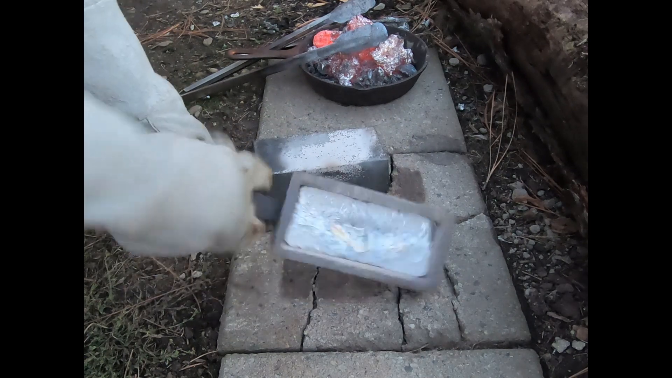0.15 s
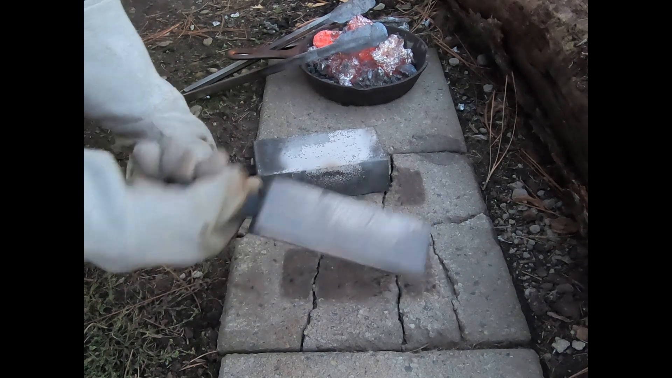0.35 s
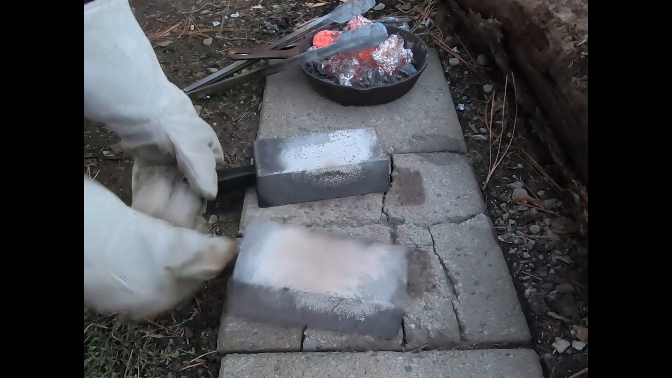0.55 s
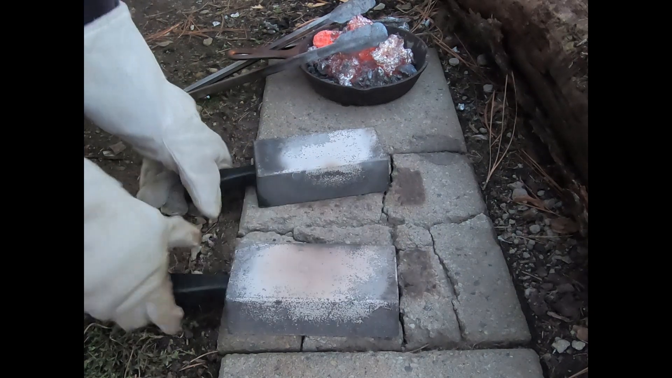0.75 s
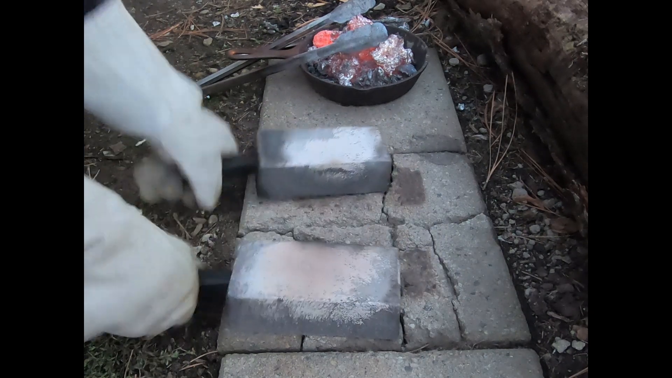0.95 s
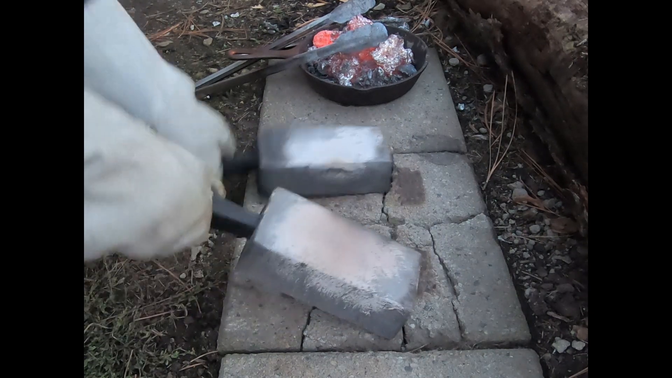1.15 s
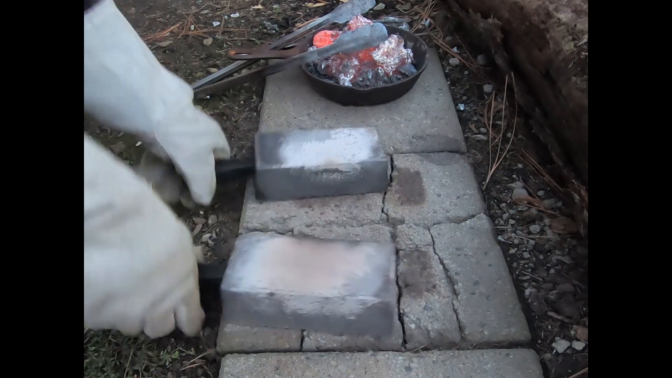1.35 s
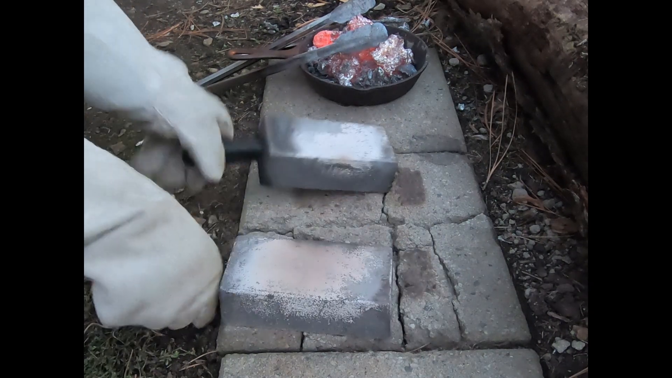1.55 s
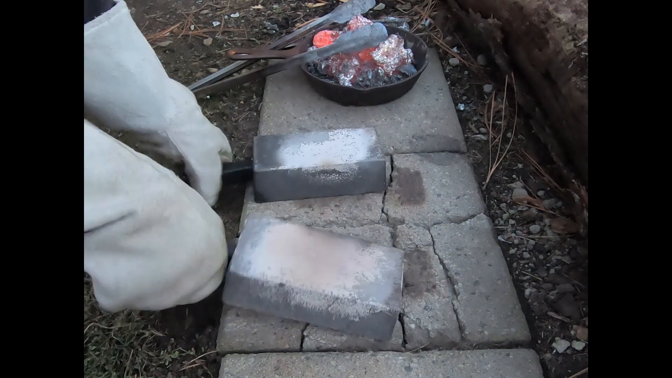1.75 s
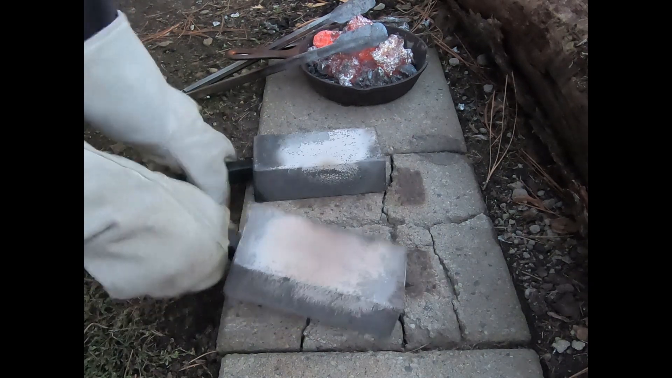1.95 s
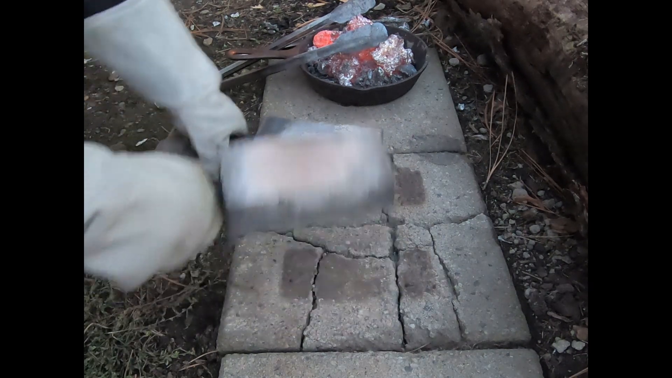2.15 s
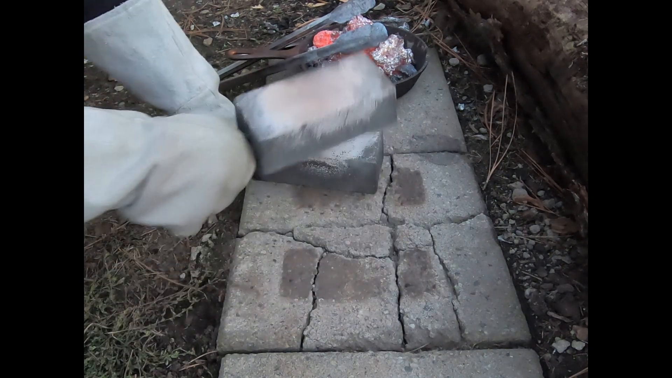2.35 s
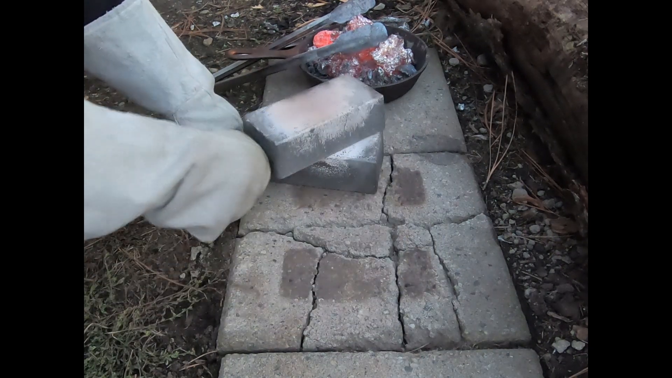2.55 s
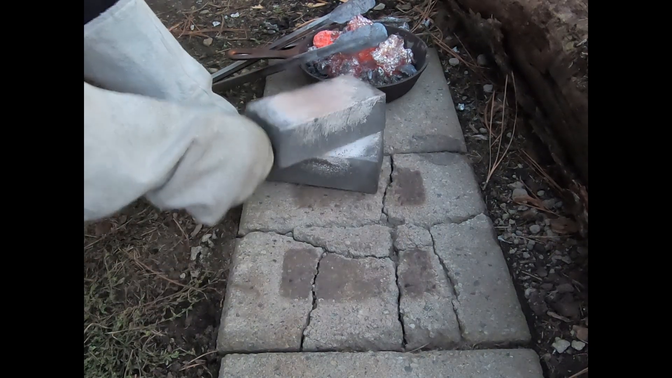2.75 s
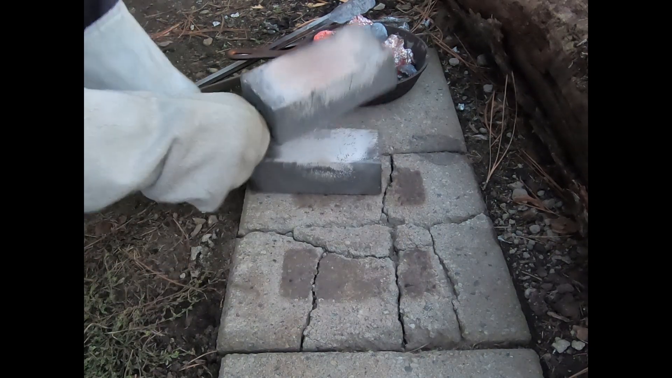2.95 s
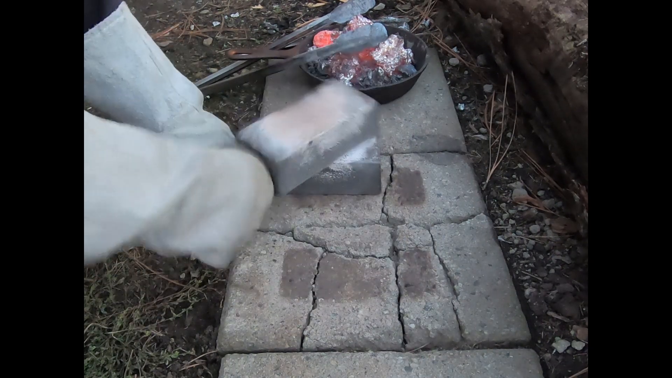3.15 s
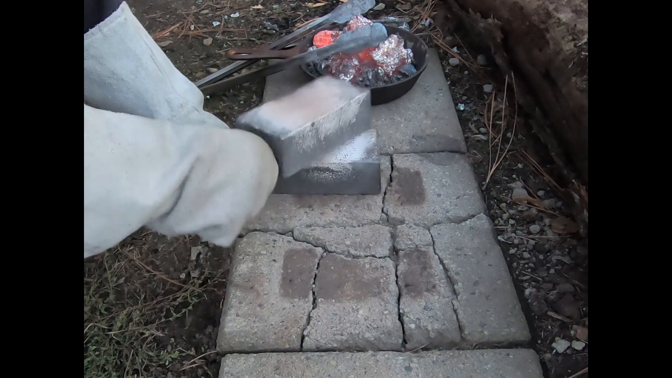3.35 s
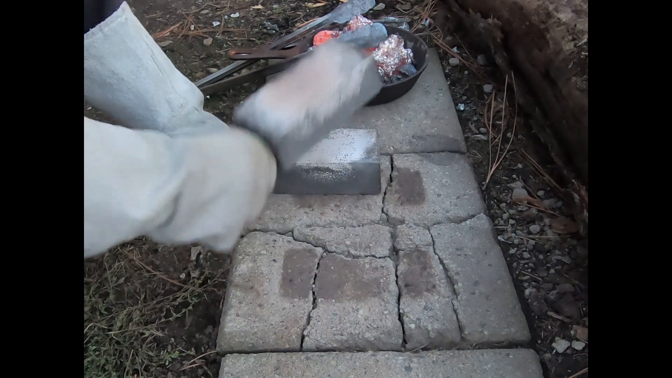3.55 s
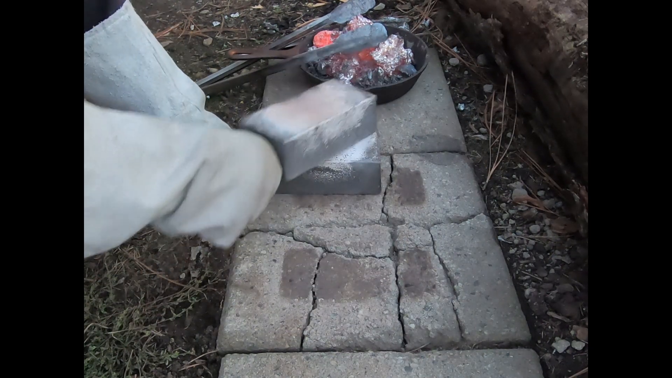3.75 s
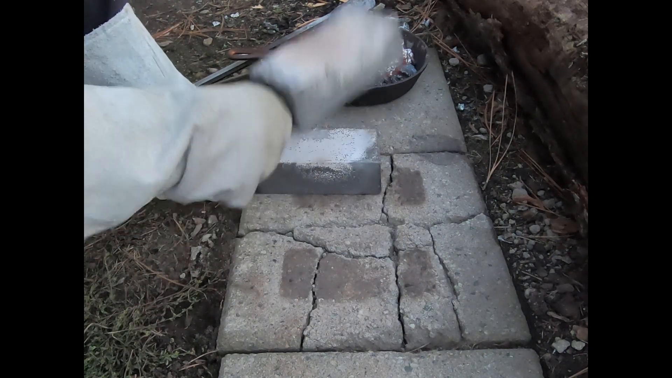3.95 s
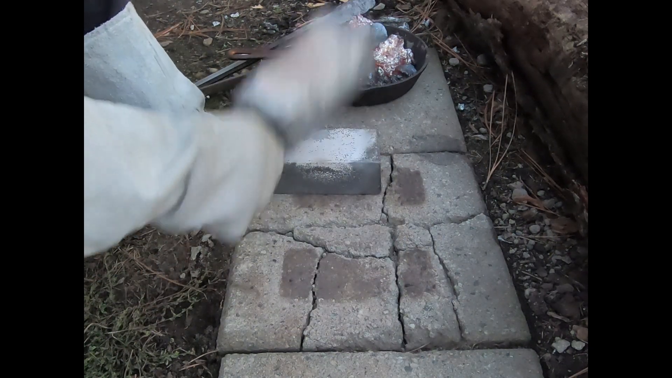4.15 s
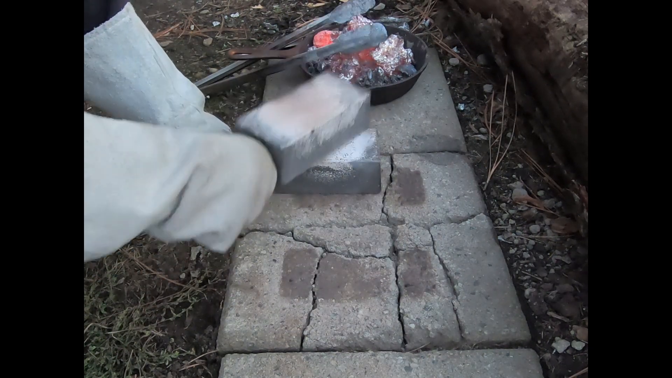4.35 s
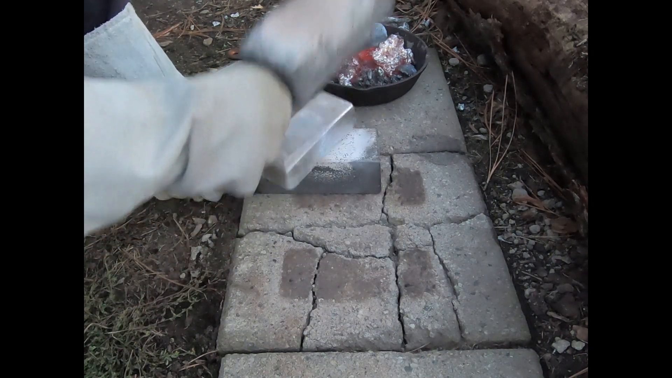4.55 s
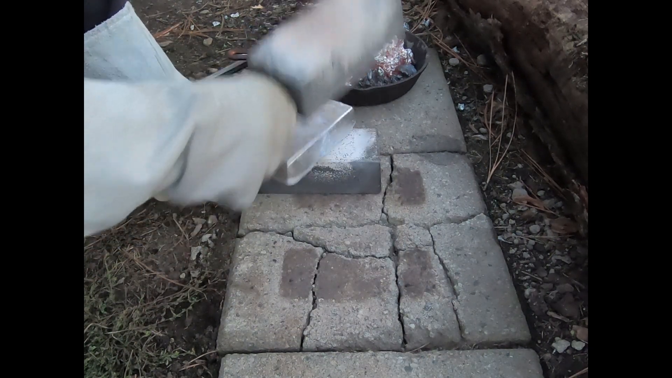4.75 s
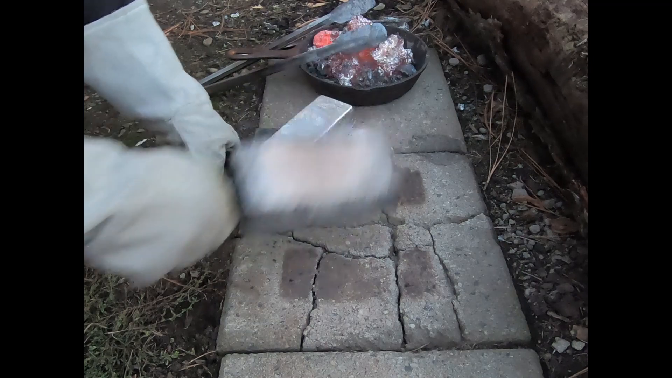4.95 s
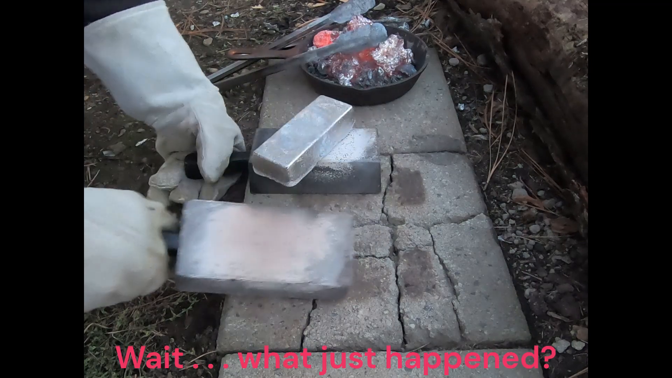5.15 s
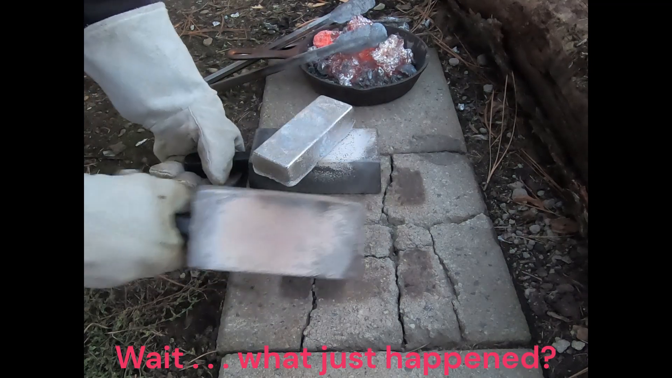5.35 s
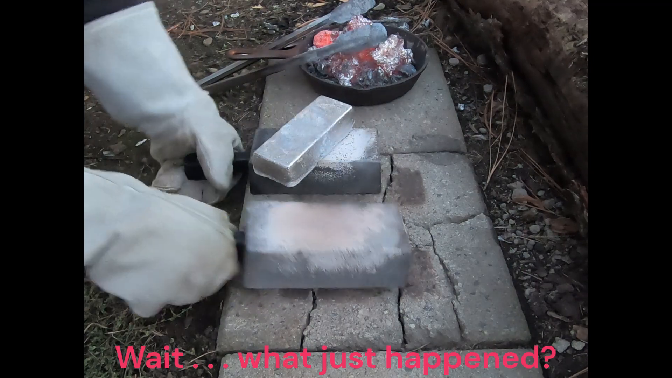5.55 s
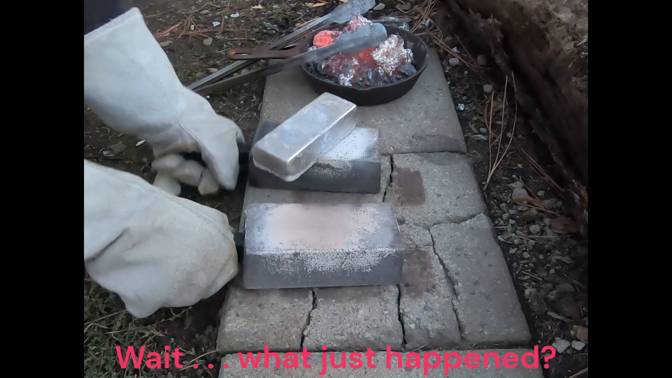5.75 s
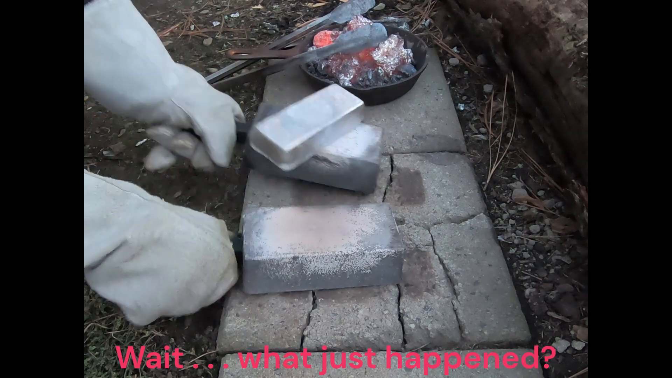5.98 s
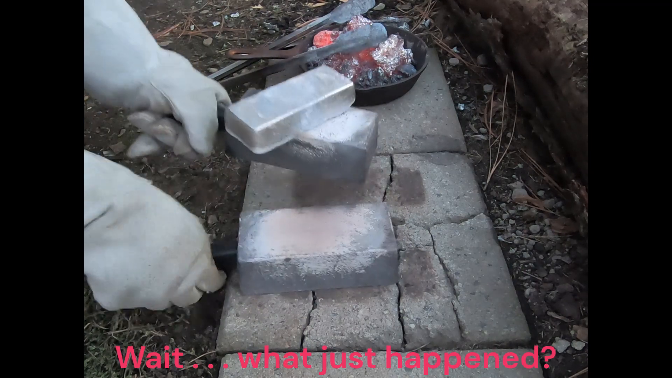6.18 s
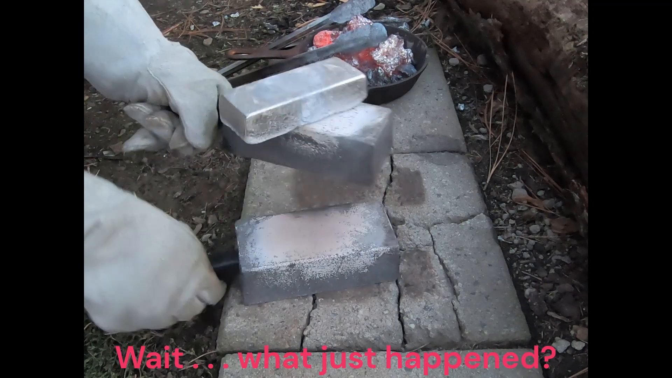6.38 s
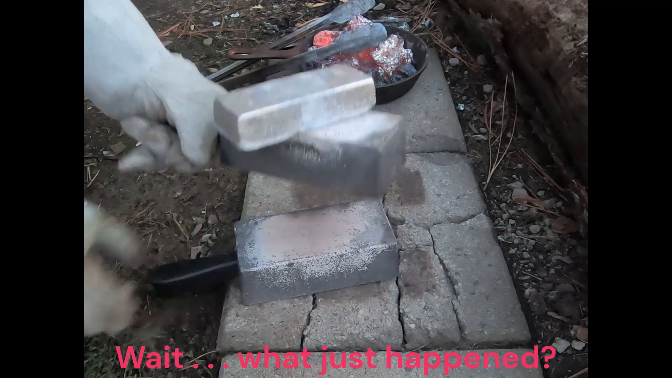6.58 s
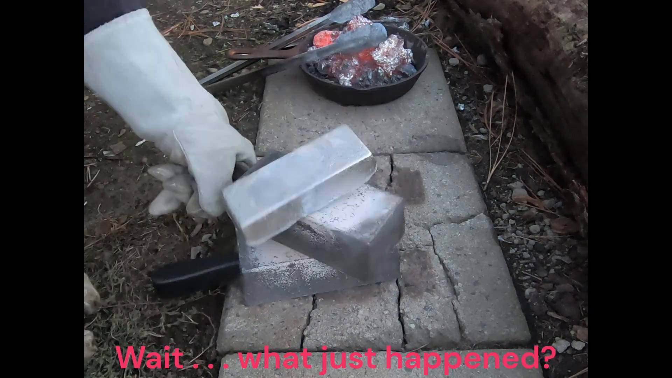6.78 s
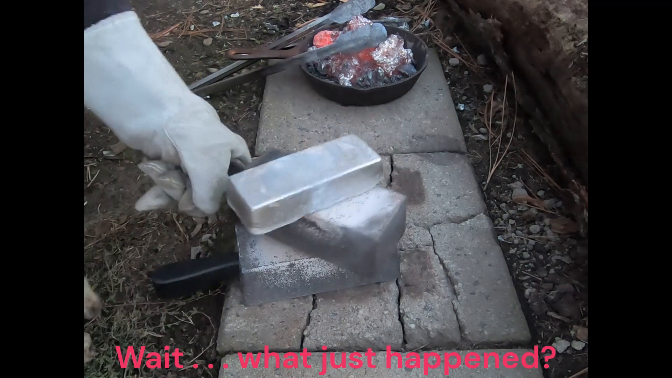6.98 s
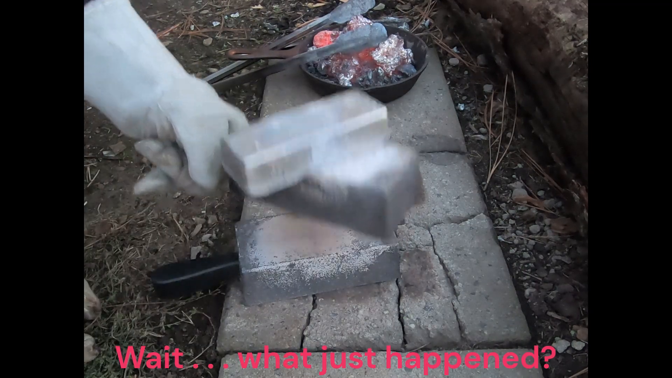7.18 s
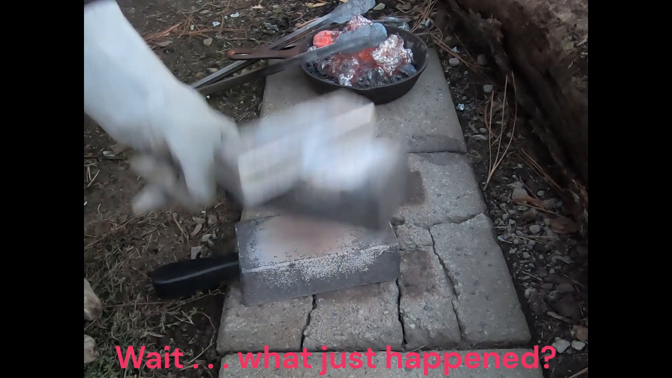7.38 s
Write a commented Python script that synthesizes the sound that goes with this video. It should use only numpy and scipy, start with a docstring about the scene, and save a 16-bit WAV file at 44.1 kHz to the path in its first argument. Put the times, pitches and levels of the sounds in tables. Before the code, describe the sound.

A heavy iron mould rattles and thumps on concrete pavers, then bangs hard on a second mould until a metal ingot clinks loose outdoors.

```python
"""A quick rattle of iron on stone comes first, over distant traffic, then heavier thumps and loud bangs.
A cast-iron ingot mould is flipped and banged on concrete pavers and on a second mould, in a yard.
Each contact is a low thump of dying sines, a clack of noise bursts and the ringing modes of the iron.
A freed ingot clinks with short modes; gloves and grit rub as shaped noise; grit snaps in tiny bursts.
A far wall throws the blows back; near the end the sound turns wider and brighter."""
import sys
import numpy as np
from scipy import signal
from scipy.io import wavfile
from scipy.ndimage import uniform_filter1d

SR = 44100
rng = np.random.default_rng(int(sys.argv[2]) if len(sys.argv) > 2 else 0)


def unload_wav(signal):
    """Save mono or channel-first audio to the path in sys.argv[1] as 16-bit WAV at rate SR, clipped to [-1, 1]."""
    wavfile.write(
        sys.argv[1],
        SR,
        np.round(np.clip(np.atleast_2d(signal).T, -1, 1) * 32767).astype(np.int16),
    )


N = 327222  # length in samples


def amp(db):
    """Turns decibels into a gain."""
    return 10 ** (np.asarray(db) / 20)


def evened(x):
    """Scales a signal to an average (rms) strength of 1."""
    return x / np.sqrt(np.mean(x ** 2) + 1e-20)


def read(points, hz):
    """Reads a curve between its points, along a logarithmic pitch axis."""
    point_hz, value = np.transpose(points)
    return np.interp(np.log(hz + 1), np.log(point_hz + 1), value)


def add(mix, start_s, sound):
    """Mixes a sound in from a given second, cutting off what runs past the end."""
    part = mix[round(start_s * SR):][:len(sound)]
    part += sound[:len(part)]


def coloured(x, points):
    """Filters to a (Hz, dB) curve with minimum phase, so that blows keep their sharp front."""
    db = np.maximum(read(points, abs(np.fft.fftfreq(8192, 1 / SR))), -100)
    log_gain = np.log(amp(db))
    taps = np.fft.ifft(np.exp(np.conj(signal.hilbert(log_gain)))).real[:4096]
    taps = taps.reshape((1,) * (x.ndim - 1) + (-1,))
    return signal.oaconvolve(x, taps, axes=-1)[..., :x.shape[-1]]


def along(points):
    """Turns (seconds, dB) points into a gain for every sample."""
    return amp(np.interp(np.arange(N) / SR, *np.transpose(points)))


def rung(modes, t):
    """Sums dying sines: a struck solid vibrates at several pitches, each fading at its own rate."""
    return sum(amp(db - 60 * t / t60) * np.sin(2 * np.pi * hz * t) for hz, db, t60 in modes)


def burst(noise, t, lo_hz, hi_hz, t60):
    """Makes a short band of noise that dies at once, with its peak at 1."""
    band = signal.butter(3, [lo_hz, min(hi_hz, SR / 2.2)], "band", fs=SR, output="sos")
    x = signal.sosfilt(band, noise * amp(-60 * t / t60))
    return x / abs(x).max()


# The tone of the far traffic. Each row: pitch in Hz, relative level per Hz in dB.
TRAFFIC_TONE = [(15, -32.5), (25, -2), (58, 8), (96, -1.5), (187, 1), (403, -42.5), (569, -14.5),
                (781, -8.5), (1230, -12.5), (1780, -15.5), (2440, -27.5), (4990, -35), (11000, -57.5),
                (14000, -77.5)]
TRAFFIC_DB = -52.5  # average level of the whole roar


def traffic():
    """Smooth far roar: noise in short overlapping frames, with slight drifting patches of loudness."""
    frames, hz = N // 256 + 5, np.fft.rfftfreq(1024, 1 / SR)
    a, b, patches = rng.standard_normal((frames, 513, 3)).T
    patches = uniform_filter1d(patches, size=10, axis=0)
    patches = evened(uniform_filter1d(patches, size=16, axis=1))
    z = (a + 1j * b) * amp(read(TRAFFIC_TONE, hz)[:, None] + 2.4 * patches)
    roar = signal.istft(z, nperseg=1024, noverlap=768)[1][:N]
    return amp(TRAFFIC_DB) * evened(roar)


# How long the yard's echo lasts. Each row: pitch in Hz, time to fall by 60 dB in seconds.
YARD_FADE = [(100, 0.19), (400, 0.17), (1500, 0.22), (4000, 0.28), (9000, 0.36)]
# The tone of the echo as it starts. Each row: pitch in Hz, relative level in dB.
YARD_TONE = [(100, 0), (400, 3), (1500, -5.5), (5500, -2), (7000, -4.5)]
WALL_S, WALL_DB, YARD_DB = 0.13, -30, -14  # wall's slap: seconds after the scatter starts; both levels in dB
SWELL_S = 0.011  # hedges and posts before the wall start to answer this much earlier


def yard(x):
    """Echoes: dense scatter dying band by band, and a far wall's slap, a sharp copy and then a smear."""
    hz, t, z = signal.stft(rng.standard_normal(SR), SR, nperseg=256)
    fading_db = read(YARD_TONE, hz)[:, None] - 60 * t / read(YARD_FADE, hz)[:, None]
    tail = signal.istft(z * amp(fading_db), SR, nperseg=256)[1][:SR]
    after_wall = np.arange(SR) / SR - WALL_S
    swell = np.clip(after_wall / SWELL_S + 1, 0, 1) ** 2
    slap = rng.standard_normal(SR) * swell * amp(-60 * np.maximum(after_wall, 0) / 0.31)
    slap[round(WALL_S * SR)] = 14.0  # the sharp copy
    slap = signal.sosfilt(signal.butter(2, [1800, 6500], "band", fs=SR, output="sos"), slap)
    taps = amp(YARD_DB) * tail / np.linalg.norm(tail) + amp(WALL_DB) * slap / np.linalg.norm(slap)
    return signal.fftconvolve(x, np.r_[np.zeros(300), taps])[:N]  # all echoes wait 300 samples


# Hands shake the ground. Each row: time in seconds, level in dB, with straight lines between rows.
BUMPS = [(0, -38), (.97, -47), (1.3, -37.5), (1.88, -51), (2.13, -37.5), (2.35, -48), (3.16, -47),
         (3.372, -66), (3.66, -43.5), (3.987, -58.5), (5.211, -48), (6.138, -49), (6.339, -39.5),
         (6.8, -53), (7.42, -68.5)]


def hands():
    """Lumpy low bumps: low noise whose strength wanders at random."""
    noise = rng.standard_normal(N)
    lumps = noise * amp(3.82 * evened(uniform_filter1d(rng.standard_normal(N), size=900)))
    bumps = coloured(lumps, [(25, -30.0), (70, 4.5), (200, -2.0), (500, -13.0), (1200, -19.0), (5000, -54.0)])
    return along(BUMPS) * evened(bumps)


# Grains of grit crack. Each row: start in seconds, peak level in dB.
SNAPS = [(0.736, -51), (6.101, -46), (6.176, -41), (6.222, -51), (6.375, -31.5)]


def snaps():
    """Very short wide ticks of noise."""
    out, t = np.zeros(N), np.arange(SR // 40) / SR
    for (s, db), noise in zip(SNAPS, rng.standard_normal((len(SNAPS), len(t)))):
        add(out, s, amp(db) * burst(noise, t, lo_hz=700, hi_hz=6900, t60=0.011))
    return out


# The iron mould's own pitches, before the spot struck and the contact change them.
# Each row: pitch in Hz, relative level in dB, time to fall by 60 dB in seconds.
MOULD_MODES = list(zip([1135, 1515, 1980, 2580, 2860, 3040, 3550, 4105, 4204, 4720, 5045, 5440, 6370, 7300, 7660, 8755, 9260, 10030],
               [-5, -8, -8, -7, -3, -6, -2, -2, -13, -6, -2, -5, -7, -14, -10, -14, -17, -15],
               [.09, .1, .06, .08, .14, .1, .1, .1, .3, .08, .18, .12, .1, .08, .07, .08, .08, .06]))


def iron(spot_hz, long, chance, focus_db, longest=np.inf):
    """The mould's modes as one spot excites them: those near its pitch stand out and linger, the rest vary."""
    modes = []
    for (hz, db, t60), luck in zip(MOULD_MODES, chance):
        away = min(abs(np.log2(hz / spot_hz)) / .035, 1)  # 0 at the favoured pitch, 1 from .035 octave off
        level_db = db - focus_db * away + 4 * luck * away
        modes.append((hz, level_db, min(t60 * long, longest) * (1 - .6 * away)))
    return modes


# Iron slides over grit and gloves rub. Each row: start in seconds, length in seconds,
# relative level of the rasp in dB, relative level of the singing iron in dB, pitch it favours in Hz.
SCRAPES = [(0, 0.21, -58.5, -76, 6400), (0.106, 0.055, -64, -58, 3520), (0.187, 0.36, -63.5, -84, 4200),
           (0.297, 0.031, -44.5, -37, 6400), (0.487, 0.12, -46, -68, 2860), (0.539, 0.027, -59, -45, 2700),
           (0.628, 0.072, -42, -63, 4200), (0.908, 0.11, -58.5, -66.5, 4200), (1.07, 0.076, -55, -58, 4200),
           (1.123, 0.081, -55.5, -63.5, 5410), (1.203, 0.059, -43.5, -74, 7660),
           (1.33, 0.055, -40.5, -74, 7660), (1.719, 0.11, -64, -64.5, 5420), (2.124, 0.1, -53.5, -57, 3040),
           (2.236, 0.075, -64, -76, 2860), (4.778, 0.44, -70, -83, 8750), (5.203, 0.18, -69.5, -84, 5040),
           (5.64, 0.07, -63, -56.5, 2860), (5.659, 0.09, -81, -63.5, 5045), (5.977, 0.42, -63, -85.5, 3520),
           (6.189, 0.51, -63, -74, 2860), (6.212, 0.026, -79, -55, 5040), (6.298, 0.048, -83, -63, 5040),
           (6.371, 0.03, -73, -57.5, 5040), (6.518, 0.06, -69, -63, 5040), (6.796, 0.25, -65, -65, 3520)]
RASP_HZ, RASP_RISE = 6980, 0.35  # rasp centre of a 1 s stroke; short scuffs are duller, as length to this power


def scrapes():
    """Clumpy grit rasps in a broad band, and its grains keep the iron modes singing."""
    out, ring_t, t = np.zeros(N), np.arange(SR // 8) / SR, np.arange(SR // 2) / SR
    draws = rng.standard_normal((len(SCRAPES), 4, SR // 2))
    for (s, length, rasp_db, sing_db, spot_hz), (hiss, lumps, grit, luck) in zip(SCRAPES, draws):
        hz = RASP_HZ * length ** RASP_RISE
        stroke = np.sin(np.pi * np.clip(t / length, 0, 1) ** 0.9) ** 1.02
        clumps = stroke * amp(2.8 * evened(uniform_filter1d(lumps, size=400)))
        colour = [(hz / 8, -18), (hz / 3, -5), (hz, .1), (hz * 1.3, -10), (hz * 4, -30)]
        rasp = evened(coloured(hiss * amp(1.9 * grit), colour)) * clumps
        grains = (abs(grit) > 2.5) * grit * clumps  # only the rare strong grains strike the iron
        ring = rung(iron(spot_hz, .8, luck, focus_db=13), ring_t)
        sung = signal.oaconvolve(grains, ring)[:len(t)]
        add(out, s, amp(rasp_db) * rasp + amp(sing_db) * evened(sung) * np.sqrt(2 * length))
    return coloured(out, [(30, 7.0), (10200, 1.4), (11200, -16.0), (16000, -12.0)])  # little grit above the top mode


# The aluminium ingot clinks.
# Each row: start in seconds, relative level in dB, pitch that the spot struck favours in Hz.
CLINKS = [(4.581, -42, 4680), (4.599, -42, 4680), (4.733, -29.5, 4680), (4.803, -55.5, 4680),
          (5.9237, -36, 4680), (6.045, -45, 4680), (6.6906, -37.5, 5750), (6.9587, -11, 4680),
          (7.084, -46, 5750), (7.118, -54.5, 5750), (7.293, -42, 5750), (7.3972, -34, 4680)]
# The ingot's own pitches. Each row: pitch in Hz, relative level in dB, time to fall by 60 dB in seconds.
INGOT_MODES = list(zip([1620, 2800, 3130, 4680, 5220, 5750], [-13, -13, -15, 0.5, -6, -4],
               [.03, .025, .04, .045, .05, .03]))


def clinks():
    """The ingot's short ring with a noisy tick of contact."""
    out, t = np.zeros(N), np.arange(SR // 4) / SR
    for (s, db, spot_hz), noise in zip(CLINKS, rng.standard_normal((len(CLINKS), len(t)))):
        tick = amp(-4) * burst(noise, t, lo_hz=1470, hi_hz=5900, t60=0.027)
        # modes away from the spot's pitch are 6 dB weaker
        modes = [(hz, level_db - 6 * (abs(hz / spot_hz - 1) > .06), t60) for hz, level_db, t60 in INGOT_MODES]
        add(out, s, amp(db) * (rung(modes, t) + tick))
    return out


# The mould touches stone. Each row: start in seconds, then relative levels and pitches: thump in dB,
# thump in Hz, clack in dB, ring in dB, pitch that the spot struck favours in Hz.
KNOCKS = [(0.029, -29.5, 311, -44, -44.5, 3520), (0.115, -31, 334, -45, -50, 3520),
          (.125, -24, 331, -39, -41, 3520), (0.149, -27, 332, -37, -49, 4200),
          (.186, -19.5, 200, -25, -29.5, 7660), (0.303, -18.5, 334, -31, -44, 6400),
          (0.387, -24, 313, -48, -44, 4200), (.527, -10, 228, -14.5, -19.5, 4100),
          (0.548, -14, 171, -19, -24, 2860), (0.582, -22.5, 294, -27, -34.5, 2860),
          (0.615, -24, 165, -21, -32.5, 4100), (.653, -24, 193, -19, -18, 1515),
          (0.6554, -11, 200, -10.5, -16, 4300), (0.68, -32, 188, -42, -32, 1980),
          (0.695, -19.5, 140, -21, -35, 4200), (.951, -32.5, 214, -31, -49, 2650),
          (1.083, -33.5, 202, -56, -42.5, 4200), (1.181, -21, 216, -34, -62, 4200),
          (1.222, -3.5, 191, -7, -21, 5045), (1.26, -28, 194, -32, -47, 2860),
          (1.321, -21, 320, -22.5, -33, 1135), (1.357, -5, 174, -6, -12.5, 3520),
          (1.381, -17, 115, -44, -59, 1135), (1.414, -21.5, 178, -30.5, -35.5, 7660),
          (1.597, -28.5, 173, -33.5, -45, 4200), (1.642, -24.5, 202, -41, -77, 2860),
          (1.702, -8.5, 201.7, -16, -35.5, 4100), (1.726, -22, 302, -27.5, -49, 1135),
          (1.867, -32.5, 203, -49, -57, 1135), (2.134, -13.5, 217, -30, -46, 3550),
          (2.152, -23.5, 338, -29, -44, 3550), (2.262, -33, 247, -47, -49, 2860),
          (2.824, -26.5, 207, -71, -54, 4160), (2.921, -50, 199.6, -57, -52, 5410),
          (3.014, -17, 188.6, -18.5, -37.5, 2580), (3.034, -40, 295, -38, -63, 1135),
          (3.273, -15.5, 194, -19, -22, 3520), (3.688, -31.5, 301, -28, -24.5, 4204),
          (4.323, -31, 130.6, -35, -43, 1135), (4.35, -54, 196, -34.5, -49, 1135),
          (4.578, -29.5, 259, -30.5, -48, 2860), (4.592, -30.5, 285, -48, -53, 2860),
          (4.6, -23, 203, -29.5, -39, 3040), (4.725, -31.5, 294, -40, -59, 4690),
          (4.735, -27.5, 204, -34, -50, 4690), (4.803, -28.5, 131, -44, -59, 4700),
          (5.625, -14.5, 312.6, -29, -29, 3550), (5.645, -20, 174.6, -23.5, -38, 2860),
          (5.679, -25, 204, -32, -53, 1980), (5.707, -23, 148, -30.5, -64, 2860),
          (6.093, -40, 203, -42.5, -43, 4700), (6.171, -44, 255, -39.5, -43, 2580),
          (6.179, -36, 290, -36.5, -42, 5045), (6.222, -27, 218, -50, -49, 5040),
          (6.376, -47, 147.5, -34.5, -42, 5045), (6.509, -31, 227.6, -37.5, -50.5, 1135)]
# The mould is banged on the second mould. Each row: the same columns, then the centre of the crack in Hz.
BANGS = [(2.552, -6, 213, -17, -11, 7660, 1860), (2.5607, -10, 231, -14.5, -8.5, 4204, 2610),
         (3.179, -5.5, 219, -12, -10, 4093, 5430), (3.189, -7.5, 180, -13, -8.5, 3550, 3003),
         (3.6609, -10.5, 205, -22.5, -10, 2860, 2780), (3.6654, -8.5, 196, -10, -10.5, 4150, 5100),
         (4.2482, -20, 252, -9, -7.5, 4105, 5330), (4.2508, -5, 163, -29, -7, 2860, 3500),
         (6.7579, -10.5, 213, -14.5, -7.5, 7660, 2060), (6.772, -9.5, 177, -18.5, -9, 4130, 4700)]
# How the paver thumps. Each row: factor on the thump's pitch, relative level in dB,
# time to fall by 60 dB in seconds.
PAVER_MODES = [(1.018, 5, 0.033), (.52, -17, 0.23), (1.673, -10.5, 0.061), (0.3, -23.5, 0.36)]
THUMP_LAG_S = 0.0014  # the slab answers a moment after the contact
CRACK_DB = 8.5  # added to the ring's level for the crack
# Ring length factors: the next contact cuts a ring short if it comes sooner than REBOUND_S seconds.
RING_CUT, RING_FREE, REBOUND_S = .28, 3.0, .02
LINGER, DAMPED_T60 = .045, .06  # share of the ring that outlasts the contact; longest t60 of the rest (s)
# Ring over clack: below the first the stone deadens the iron, above the second it rings free.
ON_STONE_DB, ON_IRON_DB = -5, 2


def knocks():
    """Each blow pushes the slab and rings the iron; returns the low thumps and the bright part apart."""
    low, high, t = np.zeros(N), np.zeros(N), np.arange(SR // 2) / SR
    rows = sorted([(*row, row[-1]) for row in KNOCKS] + BANGS)  # on stone the crack centres on the spot's pitch
    noise = rng.standard_normal((len(rows), 5, len(t)))
    push = 1 - np.exp(-t / 0.0015)  # the slab takes a moment to move
    bite = 1 - np.exp(-t / .0003)  # heavy iron meets over a short while
    waits = np.diff([row[0] for row in rows], append=N / SR)
    for row, wait, (a, b, c, luck, e) in zip(rows, waits, noise):
        s, thump_db, hz, clack_db, ring_db, spot_hz, crack_hz = row
        free = np.interp(ring_db - clack_db, [ON_STONE_DB, ON_IRON_DB], [0, 1])
        long = RING_CUT + (RING_FREE - RING_CUT) * min(wait / REBOUND_S, 1) * free
        slab = rung([(hz * k, db, t60) for k, db, t60 in PAVER_MODES], t)
        add(low, s + THUMP_LAG_S, -amp(thump_db) * push * slab)
        clack = amp(clack_db + 2.5) * burst(a, t, lo_hz=347, hi_hz=1384, t60=0.017)
        wide = amp(-3.0) * burst(b, t, lo_hz=1209, hi_hz=6300, t60=0.016)
        centre = amp(-4.5) * burst(e, t, lo_hz=crack_hz / 1.3, hi_hz=crack_hz * 1.17, t60=0.016)
        crack = amp(ring_db + CRACK_DB) * (wide + centre)
        pressed = rung(iron(spot_hz, long, luck, focus_db=5.0, longest=DAMPED_T60), t)
        # the iron keeps touching what it rests on
        chatter = amp(3.5 * evened(uniform_filter1d(c, size=180)))
        freed = chatter * rung(iron(spot_hz, long, luck, focus_db=3.0), t)
        ring = amp(ring_db + 2.0) * (pressed + LINGER * freed)
        add(high, s, bite * (clack + crack + ring))
    return low, high


# The tone of the blows' bright part and of the clinks. Each row: pitch in Hz, gain in dB.
BLOW_TONE = [(30, 2), (300, 6.5), (3000, -4.5), (6000, -13.5), (10000, -20), (11500, -54), (16000, -44.5)]
# Share of unlike sound in the two channels. Each row: time in seconds, share in dB.
WIDTH = [(0, -60), (5.4, -60), (5.6, -8), (7.42, -8)]
# The tone of that unlike sound. Each row: pitch in Hz, gain in dB.
UNLIKE_TONE = [(40, 11), (150, -5), (400, -20.5), (1200, -3), (3600, -10), (5000, -0.5), (8000, 7.5),
               (12000, -2)]


def scene():
    """Mixes all sources, nearly alike in both channels until the last two seconds, wider and brighter."""
    low, high = knocks()
    blows, pings = low + coloured(high, BLOW_TONE), coloured(clinks(), BLOW_TONE)
    mid = blows + pings + yard(blows + .3 * pings) + scrapes() + snaps() + hands() + traffic()
    share = along(WIDTH)
    mid = mid + share * coloured(mid, [(3000, -21.0), (5500, -3.0), (9000, 5.0), (14000, -6.5)])
    z = signal.stft(mid, nperseg=256)[2]
    turned = z * np.exp(2j * np.pi * rng.random(z.shape))  # same sound, unrelated phase
    unlike = 1.6 * signal.istft(turned, nperseg=256)[1][:N]
    unlike += amp(1.5) * hands()  # more bumps, opposite in the two channels
    treble = signal.sosfiltfilt(signal.butter(2, 4500, "high", fs=SR, output="sos"), mid)
    side = share * (coloured(unlike, UNLIKE_TONE) - .4 * treble)  # the treble leans to the right
    return np.array([mid + side, mid - side])


def record(dry):
    """Bass cut, soft overload near full scale, a duller top, then the band limit."""
    cut = signal.sosfilt(signal.butter(4, 48, "high", fs=SR, output="sos"), dry)
    held = cut / (1 + abs(cut / .98) ** 8) ** .125
    held = coloured(held, [(10400, -0.27), (11400, -5.0)])
    band_limit = signal.firwin(511, 16400, window=("kaiser", 9), fs=SR)  # nothing much above 16400 Hz
    return signal.oaconvolve(held, band_limit[None], "same")


dry = scene()
out = record(dry)
unload_wav(out)
```